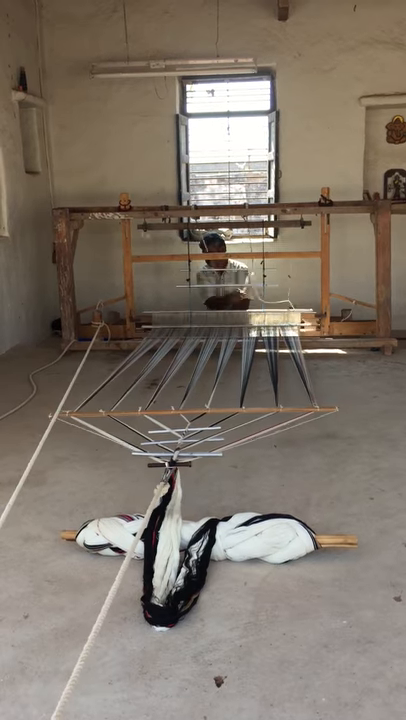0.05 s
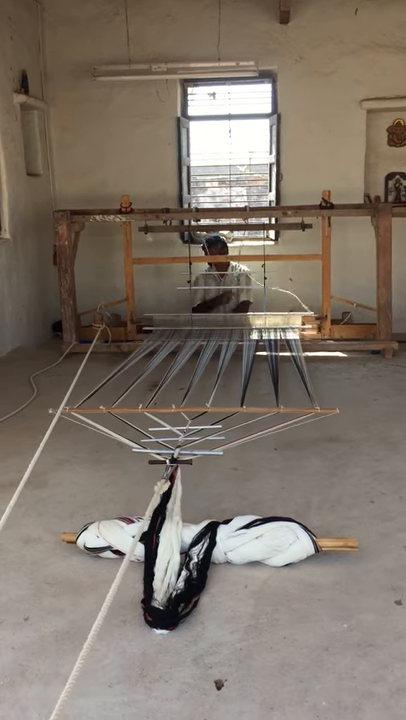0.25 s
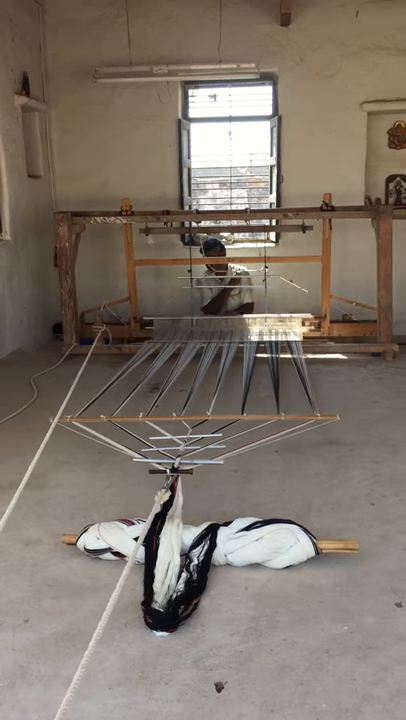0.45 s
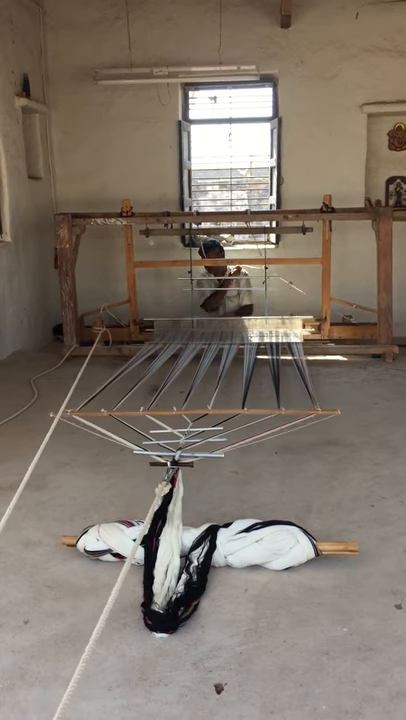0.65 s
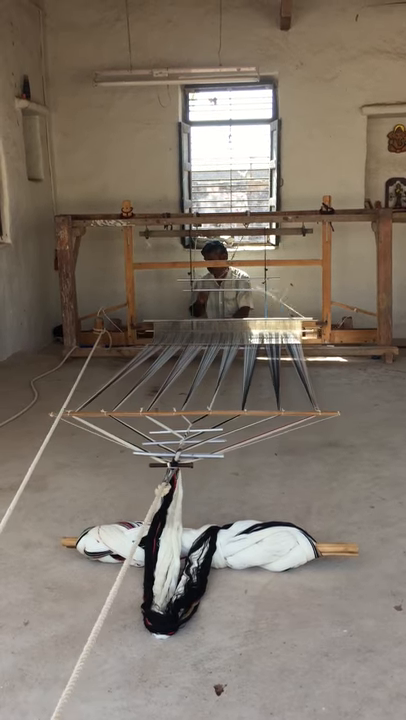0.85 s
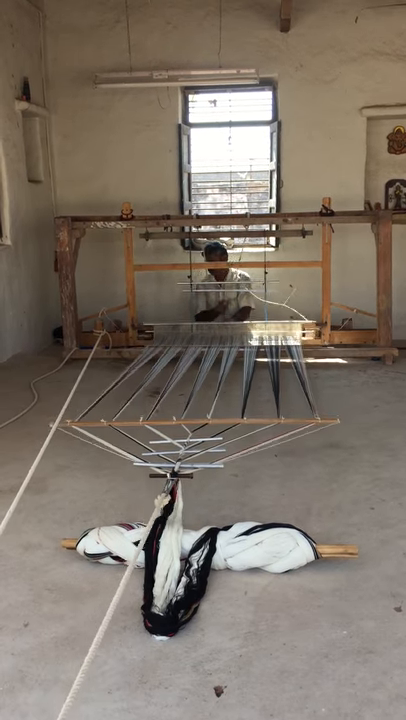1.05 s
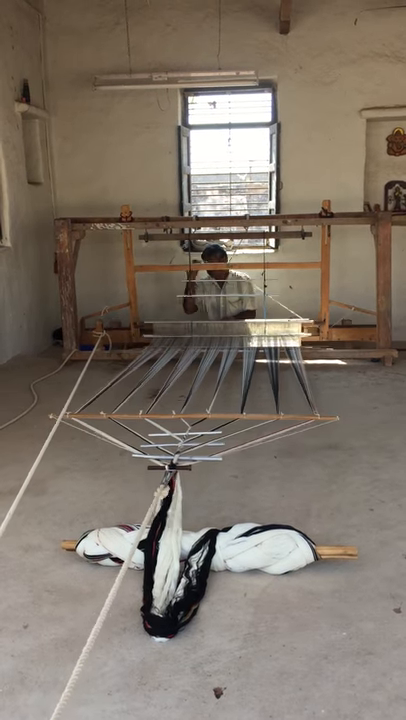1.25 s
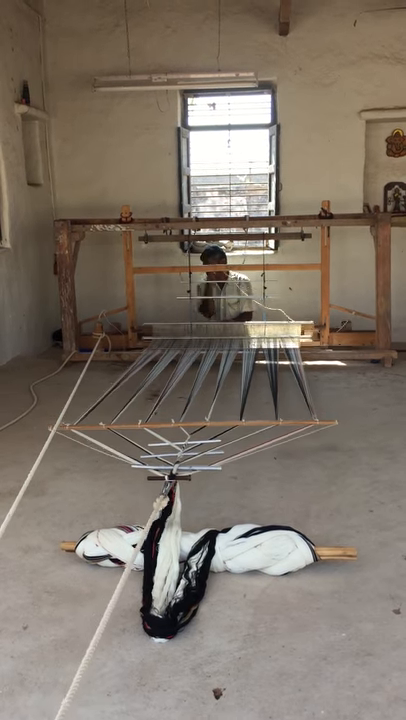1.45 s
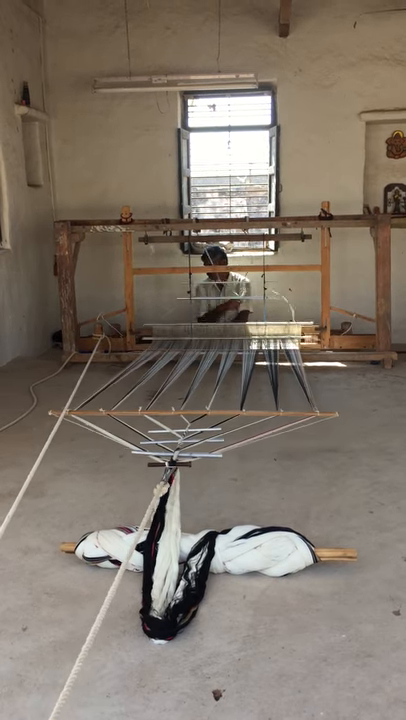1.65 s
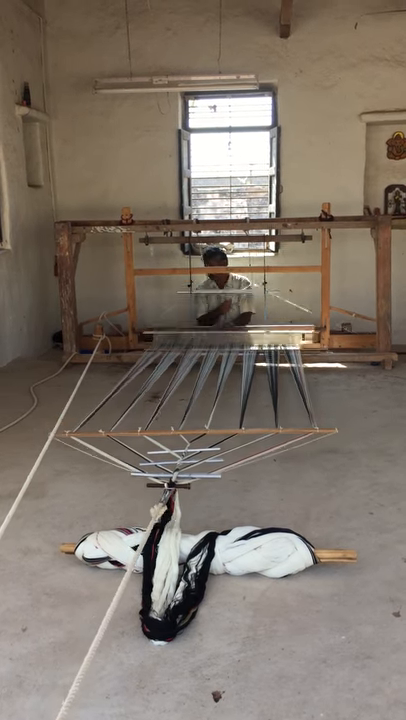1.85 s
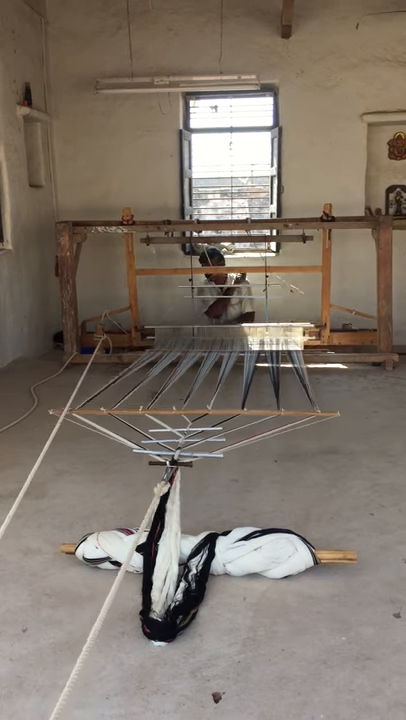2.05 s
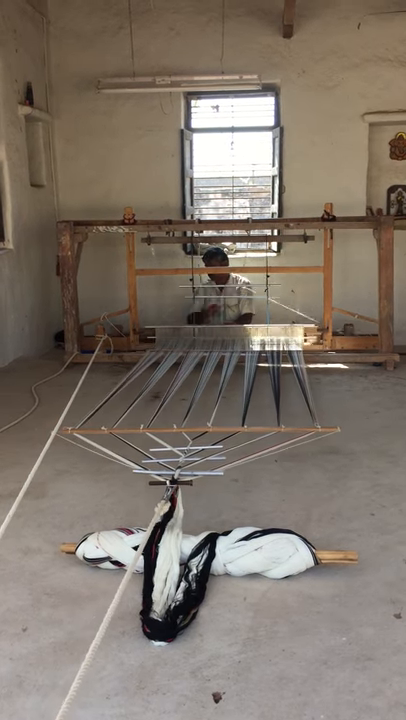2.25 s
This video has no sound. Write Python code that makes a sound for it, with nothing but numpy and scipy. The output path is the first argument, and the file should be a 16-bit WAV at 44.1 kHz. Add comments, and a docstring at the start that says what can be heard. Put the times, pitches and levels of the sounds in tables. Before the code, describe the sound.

A wooden handloom clacks in a bare plastered room, heard from metres away. A low ring fades at the start, then light knocks around 0.1-0.35 s. Loud clusters of cracks, knocks and taps strike at 0.43, 0.95, 1.16 and 1.92 s, with softer knocks between. A hard part rattles at 1.26-1.32 s. Slats chatter faintly over soft floor thumps, low rumble and street noise; weak knocks end it.

```python
"""A wooden handloom at work in a bare plastered room, heard from some metres away.
Dull knocks of the frame, sharp cracks of picker and shuttle, clean taps and a hard rattling part are all
bursts of contact noise that ring resonances; the walls smear every blow. Loose slats chatter as tiny
random clicks; low thumps through the floor, and the low ring of an earlier blow at the start, are dying
tones. A low rumble and faint street noise are coloured noise."""
import sys
import numpy as np
from scipy import signal
from scipy.fft import rfft, irfft
from scipy.io import wavfile
from scipy.ndimage import uniform_filter1d

SR = 44100
rng = np.random.default_rng(int(sys.argv[2]) if len(sys.argv) > 2 else 0)


def transcribe(signal):
    """Save signal, clipped to [-1, 1], as a 16-bit WAV file at the path in sys.argv[1]."""
    frames = np.atleast_2d(signal).T
    limited = np.clip(frames, -1, 1)
    pcm = np.round(limited * 32767).astype(np.int16)
    wavfile.write(sys.argv[1], SR, pcm)


def attenuation_scalar(level_db):
    """Turn a level in dB into a linear amplitude multiplier (20 dB per decade)."""
    decades = np.asarray(level_db, float) / 20
    return 10 ** decades


N = 101429  # samples in the scene
LENGTH = 2 ** 15  # samples kept of each blow and each wall answer


def unit(x):
    """Scale to rms 1 along the last axis."""
    return x / np.sqrt(np.mean(x ** 2, -1, keepdims=True) + 1e-20)


def along(points, hz):
    """Read a (pitch, value) table at any pitch, on a log pitch axis."""
    table_hz, value = np.transpose(points)
    return np.interp(np.log(hz + 1), np.log(table_hz + 1), value)


def curve(rows):
    """Turn a (time, value) table into one value per sample."""
    return np.interp(np.arange(N) / SR, *np.transpose(rows))


def causal(gain):
    """Minimum-phase response: this gain at each frequency, with the energy as early as possible."""
    cepstrum = irfft(np.log(gain + 1e-6))
    half = cepstrum.shape[-1] // 2
    cepstrum[..., 1:half] *= 2
    cepstrum[..., half + 1:] = 0
    return np.exp(rfft(cepstrum))


def coloured(x, spectrum):
    """Filter x through a smooth spectrum, then scale to rms 1."""
    hz = np.fft.rfftfreq(len(x), 1 / SR)
    return unit(irfft(rfft(x) * attenuation_scalar(along(spectrum, hz)), len(x)))


# how long the room rings at each pitch: pitch_hz [Hz], time to fall by 60 dB t60_s [s]
ROOM_DECAY = [(100, 0.75), (500, 0.36), (1800, 0.33), (5000, 0.32), (13000, 0.27)]


def walls(count):
    """Random echoes of the walls, energy 1 each: noise in which each frequency dies at its own speed."""
    build_s = 0.0064  # the echoes swell at first
    flutter_db, flutter_s = 2.1, 0.0035  # they come in uneven clumps
    noise = rng.standard_normal((count, LENGTH))
    hz, t, bands = signal.stft(noise, SR, nperseg=256)
    fade = attenuation_scalar(-60 * t / along(ROOM_DECAY, hz)[:, None])
    tail = signal.istft(bands * fade, SR, nperseg=256)[1][:, :LENGTH]
    tail = tail * (1 - np.exp(-np.arange(LENGTH) / SR / build_s))
    clumps = uniform_filter1d(rng.standard_normal((count, LENGTH)), round(flutter_s * SR), axis=1)
    tail = tail * attenuation_scalar(flutter_db * unit(clumps))
    return tail / np.linalg.norm(tail, axis=1, keepdims=True)


def blows(table, modes, contact, contact_db, trim_db, rise_s, chatter_s, wet_db):
    """Each blow is a short dense noise burst that rings the part's modes over contact noise, plus wall echoes."""
    grain = 1.6  # how uneven the rebounds are: higher = spikier
    scatter_db, mode_spread = 3, 0.007  # random change per blow: mode level [dB], mode pitch [fraction]
    wall_tilt_db = -2.35  # walls dull the sound, per octave
    shake = 0.19  # extra dB of echo, relative to the direct sound, per dB of blow
    start_s, level_db, tilt_db = np.transpose(table)
    count = len(start_s)
    hz = np.fft.rfftfreq(LENGTH, 1 / SR)
    t = np.arange(LENGTH) / SR

    rebounds = rng.standard_normal((count, LENGTH))
    spiky = rebounds * abs(rebounds) ** grain
    force = spiky * (1 - np.exp(-t / rise_s)) * np.exp(-t / chatter_s)

    # power spectrum of the struck part: contact noise plus one peak per mode
    vary = rng.standard_normal((count, 2, len(modes)))
    body = attenuation_scalar(contact_db + along(contact, hz)) ** 2
    for k, (pitch_hz, width_hz, mode_db) in enumerate(modes):
        centre = pitch_hz * (1 + mode_spread * vary[:, :1, k])
        height = attenuation_scalar(mode_db + scatter_db * vary[:, 1:, k]) ** 2
        detune = (hz ** 2 - centre ** 2) / (width_hz * (hz + 1))
        body = body + height / (1 + detune ** 2) ** 2

    octaves = np.log2((hz + 300) / 1500)
    slope = attenuation_scalar(np.clip(tilt_db, -8, 8)[:, None] * octaves)
    colour = causal(np.sqrt(body) * slope)
    direct = irfft(rfft(force) * colour)
    direct = direct / np.linalg.norm(direct, axis=1, keepdims=True)

    # the echoes take the part's colour but not its burst of rebounds
    wet = attenuation_scalar(wet_db + shake * (level_db[:, None] + 31.5) + wall_tilt_db * octaves)
    echo = irfft(colour * wet * rfft(walls(count)))
    echo = echo / np.linalg.norm(irfft(colour), axis=1, keepdims=True)

    out = np.zeros(N + LENGTH)
    for start, level, blow in zip(start_s, level_db, direct + echo):
        out[round(start * SR):][:LENGTH] += attenuation_scalar(level + trim_db) * blow
    return out[:N]


# colour of the street noise: pitch_hz [Hz], relative level_db [dB]
STREET_COLOUR = [(100, -22), (260, 10.5), (1600, -6), (17000, -32)]


def street():
    """Faint steady street noise: random noise through a smooth spectrum, rms -53 dB."""
    return attenuation_scalar(-53) * coloured(rng.standard_normal(N), STREET_COLOUR)


# loudness of the rumble as it wavers: time_s [s], level_db [dB]
RUMBLE_LEVEL = [(0, -47), (.35, -66), (.7, -50), (.85, -84), (.97, -47), (1.17, -92), (1.32, -49.5),
                (1.5, -45.5), (1.58, -82), (1.8, -76), (1.92, -58), (2.2, -47), (2.3, -58)]
# colour of the rumble: pitch_hz [Hz], relative level_db [dB]
RUMBLE_COLOUR = [(12, -51), (20, -30), (58, 10.5), (135, 2), (200, -2), (260, 7), (440, -120)]


def rumble():
    """Wavering low rumble: random noise, mostly bass, whose level follows a curve."""
    return attenuation_scalar(curve(RUMBLE_LEVEL)) * coloured(rng.standard_normal(N), RUMBLE_COLOUR)


# low thumps through the floor; the first row is the dying low ring of an earlier blow:
# start_s [s], level_db before the fade [dB], pitch_hz [Hz], time to fall by 60 dB t60_s [s]
LOW_TONES = [(0.0, -33, 193.4, 0.18), (0.249, -37.5, 68.5, 0.41), (.34, -33.5, 67, 0.23),
             (0.927, -40, 74, 0.27), (1.432, -33.5, 159.4, 0.14)]


def low_tones():
    """Soft low thumps and the ring of an earlier blow: one dying sine tone each, with a softened start."""
    rise_s = 0.0012
    out = np.zeros(N)
    for start_s, level_db, pitch_hz, t60_s in LOW_TONES:
        t = np.clip(np.arange(N) / SR - start_s, 0, None)
        fade = attenuation_scalar(level_db - 60 * t / t60_s)
        out += fade * (1 - np.exp(-t / rise_s)) * np.sin(2 * np.pi * pitch_hz * t)
    return out


# loudness of the loose slats as they stir and settle: time_s [s], level_db [dB]
CLATTER_LEVEL = [(.06, -45), (.15, -40.5), (1.4, -37), (1.53, -49.5), (1.62, -38.5)]
# colour of the slats: pitch_hz [Hz], relative level_db [dB]
SLAT_COLOUR = [(150, -12.5), (400, -8), (1020, 3), (2700, -6.5), (9000, -26), (16000, -48)]


def clatter():
    """Many tiny random contacts of slats and cords, heard mostly through the room."""
    ticks_per_s, size_spread_db, room_db = 440, 8.5, 12  # room_db: echo energy over the direct ticks
    hit = rng.random(N) < ticks_per_s / SR
    size = attenuation_scalar(size_spread_db * rng.standard_normal(N))
    ticks = hit * size * rng.standard_normal(N)
    echo = signal.fftconvolve(ticks, walls(count=1)[0])[:N]
    return attenuation_scalar(curve(CLATTER_LEVEL)) * coloured(ticks + attenuation_scalar(room_db) * echo, SLAT_COLOUR)


# sharp cracks of picker and shuttle:
# start_s [s], relative level_db [dB], brightness_db [dB per octave, held within 8 either way]
CRACKS = [(0.0647, -38, 8), (0.0986, -27, 5), (0.2164, -19, 1), (0.245, -32, 0), (0.4314, -12, 6),
          (0.4458, -8, -2), (0.6385, -27, -7), (0.8772, -19.5, -2.5), (0.9461, -11.5, -5),
          (0.9558, -14, 3.5), (1.1631, -8, 2), (1.5454, -39.5, 2.5), (1.5756, -28.5, 1.5), (1.703, -21, -1),
          (1.717, -21, 2), (1.9168, -9, 1), (1.9427, -8, -2.5), (2.1651, -25, -5.5), (2.2268, -28, -6.5)]
# resonances of the picker, also used by taps: pitch_hz [Hz], width_hz [Hz], relative level_db [dB]
PICKER_MODES = [(1506, 180, -0.5), (2840, 56, 0), (3710, 340, 2)]
# sharp contact noise, also used by taps and rattles: pitch_hz [Hz], relative level_db [dB]
SNAP_COLOUR = [(590, -59.5), (1000, -17.5), (2090, -11), (2410, -11), (6410, -15), (13100, -24.5),
               (16600, -34.5), (17900, -41)]


def picker_cracks():
    """Sharp cracks: bursts of strong contact noise mixed with the picker's own ringing."""
    return blows(CRACKS, PICKER_MODES, SNAP_COLOUR, contact_db=17.5, trim_db=13.0,
                 rise_s=0.0034, chatter_s=0.006, wet_db=7.5)


# dull knocks of beater and frame:
# start_s [s], relative level_db [dB], brightness_db [dB per octave, held within 8 either way]
KNOCKS = [(0.092, -18.5, 8.5), (0.186, -18.5, 5), (0.215, -15.5, -3), (0.248, -20, 4), (0.3425, -16.5, -4),
          (0.358, -14, 0.5), (0.4245, -2.5, 0.5), (0.455, -7.5, 1), (0.654, -26.5, -4.5), (0.699, -21, 8.5),
          (0.863, -18.5, -3), (0.879, -14, -1.5), (0.961, -10.5, 3.5), (1.156, -10.5, 3.5),
          (1.165, -4.5, 1.5), (1.192, -7, 2.5), (1.573, -19, 14), (1.671, -20, -2.5), (1.696, -15, -2),
          (1.727, -17, -4.5), (1.8245, -13, -5.5), (1.85, -20, 4), (1.907, -3.5, 0), (1.934, -7.5, 3),
          (1.958, -6, 3.5), (2.138, -23, -1.5), (2.199, -28.5, 8.5)]
# resonances of the frame, also used by taps: pitch_hz [Hz], width_hz [Hz], relative level_db [dB]
FRAME_MODES = [(190, 35, -17), (591, 60, -5), (970, 250, 1), (1280, 260, -1), (2450, 300, -9)]
# dull contact noise: pitch_hz [Hz], relative level_db [dB]
THUD_COLOUR = [(47, -75), (80, -16), (524, -0.5), (985, 6.5), (1180, 3.5), (1410, 8), (1660, 3.5),
               (6000, -20), (7800, -13), (13200, -120)]


def frame_knocks():
    """Dull knocks: short bursts ring the resonances of the wooden frame over a dull contact noise."""
    return blows(KNOCKS, FRAME_MODES, THUD_COLOUR, contact_db=-8, trim_db=8.5,
                 rise_s=0.0015, chatter_s=0.004, wet_db=5)


# single taps of wood on wood:
# start_s [s], relative level_db [dB], brightness_db [dB per octave, held within 8 either way]
TAPS = [(0.389, -24, 5), (0.4562, -2, -4), (0.473, -4, -4), (0.482, -6, -5), (0.7362, -21, 2),
        (0.8775, -11, -1), (0.9605, -4, 0), (1.167, -6, -3), (1.872, -23, 5), (1.9085, -5, -7)]


def single_taps():
    """Clean taps: very short bursts ring frame and picker together, with little echo left behind."""
    modes = FRAME_MODES[1:] + PICKER_MODES  # without the frame's lowest mode
    return blows(TAPS, modes, SNAP_COLOUR, contact_db=3, trim_db=8,
                 rise_s=0.0005, chatter_s=0.003, wet_db=-3)


# rattles of a hard part:
# start_s [s], relative level_db [dB], brightness_db [dB per octave, held within 8 either way]
RATTLES = [(1.256, -12.5, -3.5), (1.2795, -18.5, -3), (1.3204, -18.5, -1.5)]
# resonances of the hard part: pitch_hz [Hz], width_hz [Hz], relative level_db [dB]
HARD_PART_MODES = [(2420, 200, -10), (2980, 110, -1), (4450, 500, -14)]


def hard_part_rattles():
    """A hard part rings briefly: longer bursts excite its high resonances."""
    return blows(RATTLES, HARD_PART_MODES, SNAP_COLOUR, contact_db=1, trim_db=11.5,
                 rise_s=0.00069, chatter_s=0.013, wet_db=8.5)


def scene():
    """The loom in its room: all layers added into one channel."""
    quiet = street() + rumble() + low_tones() + clatter()
    strokes = picker_cracks() + frame_knocks() + single_taps() + hard_part_rattles()
    return (quiet + strokes)[None]


def band_limit(x):
    """A steep low-pass at the top of the band."""
    return signal.sosfilt(signal.butter(12, 18010, fs=SR, output="sos"), x)


def record(dry):
    """The phone keeps nothing at or above its band limit of 18000 Hz."""
    kept = np.fft.rfftfreq(N, 1 / SR) < 18000
    band = irfft(rfft(dry) * kept, N)
    return band_limit(band)


dry = scene()
out = record(dry)
transcribe(out)
```